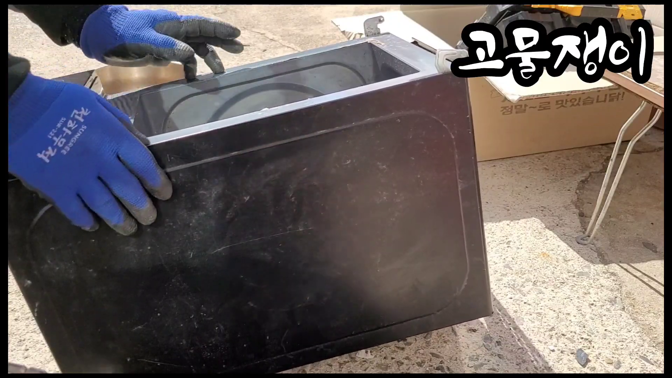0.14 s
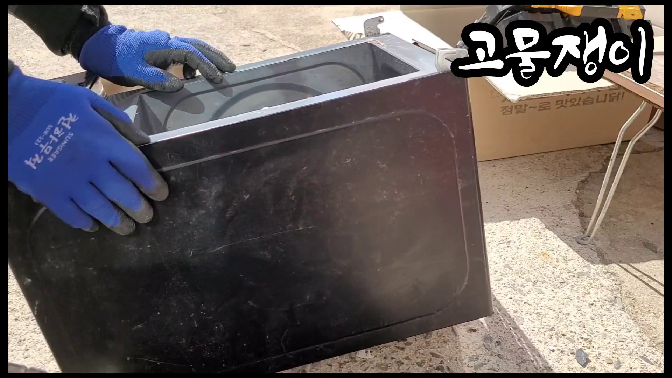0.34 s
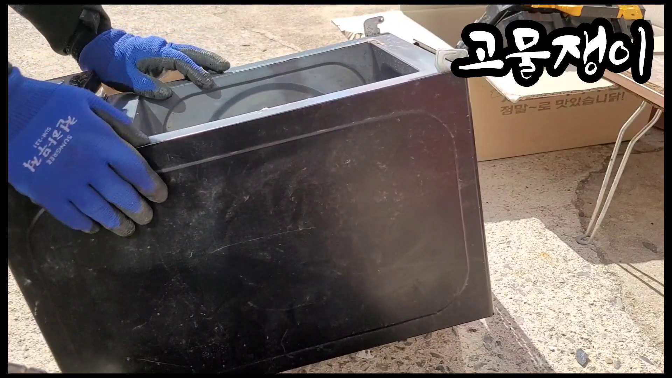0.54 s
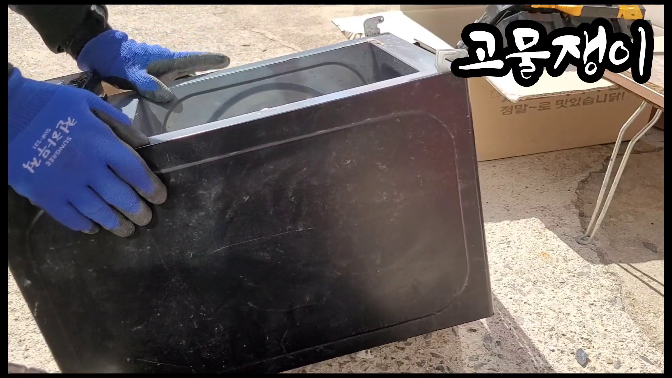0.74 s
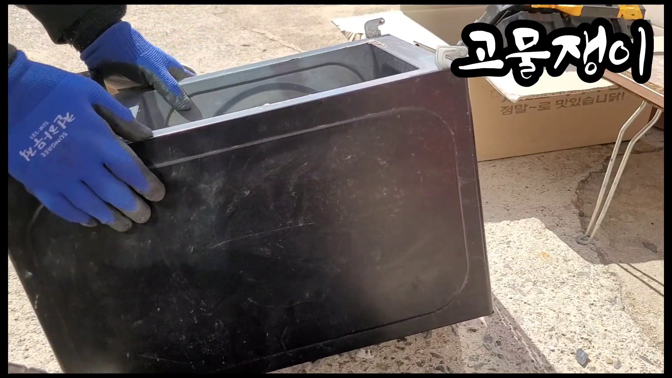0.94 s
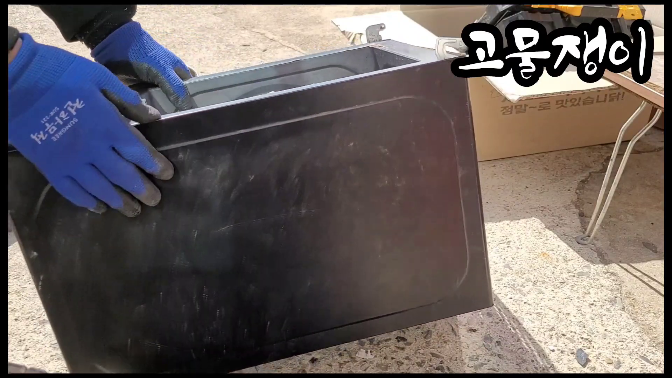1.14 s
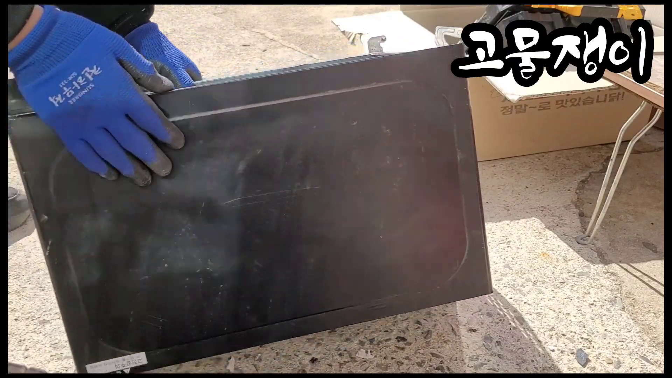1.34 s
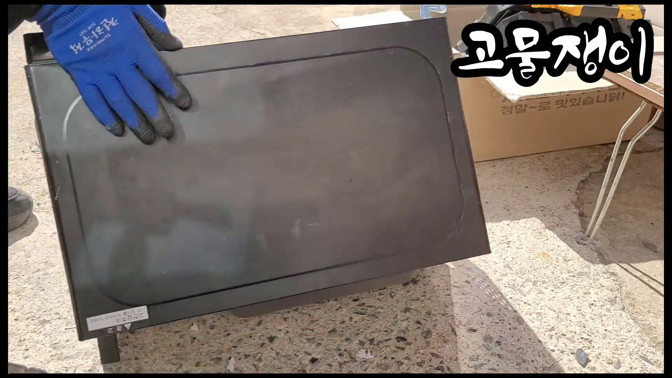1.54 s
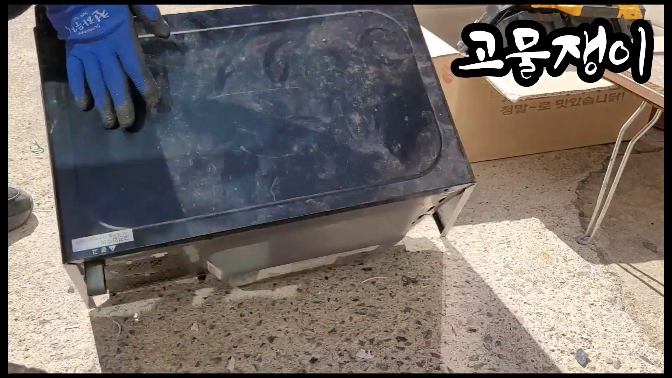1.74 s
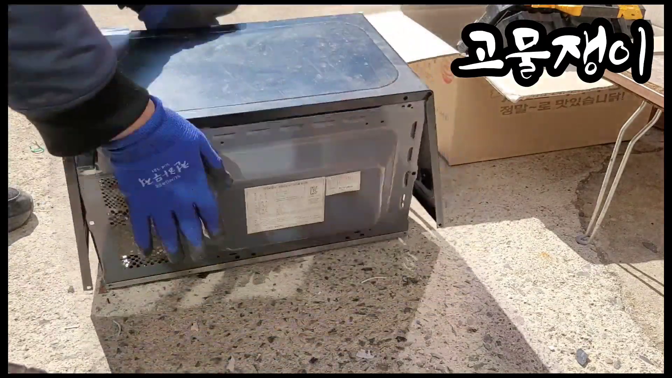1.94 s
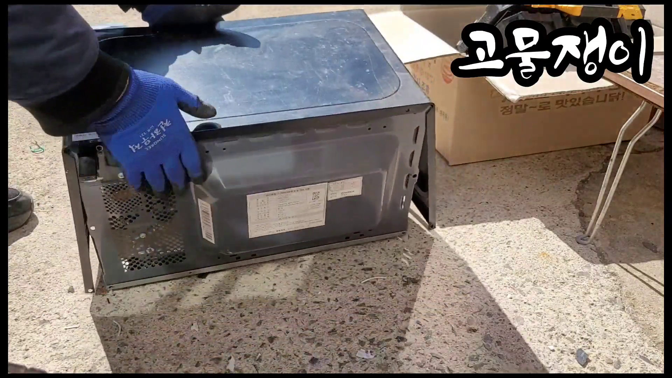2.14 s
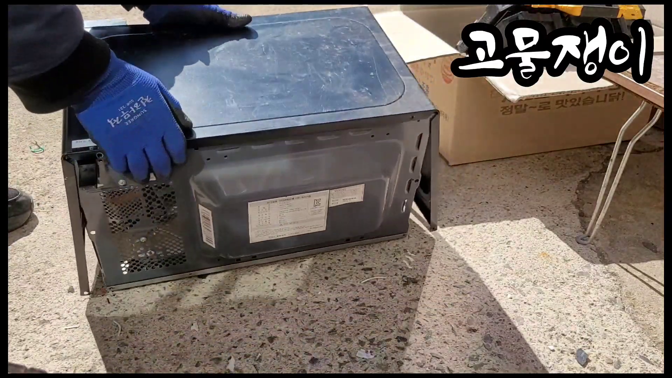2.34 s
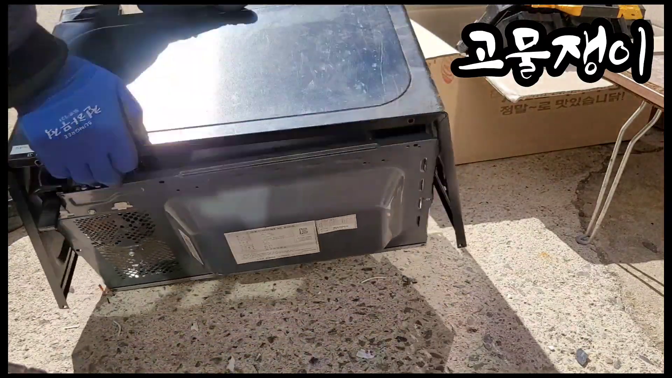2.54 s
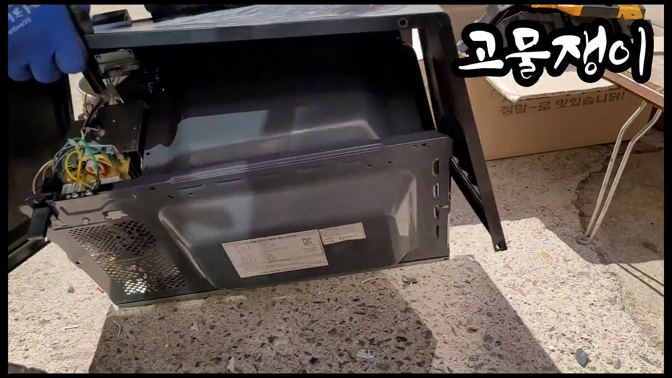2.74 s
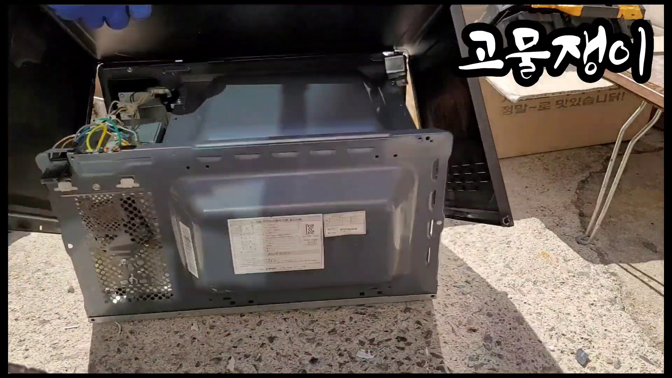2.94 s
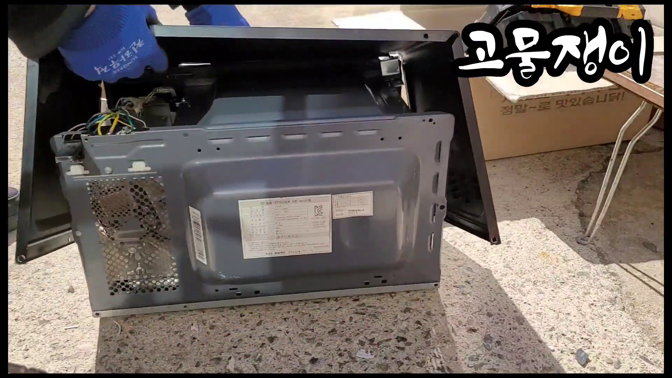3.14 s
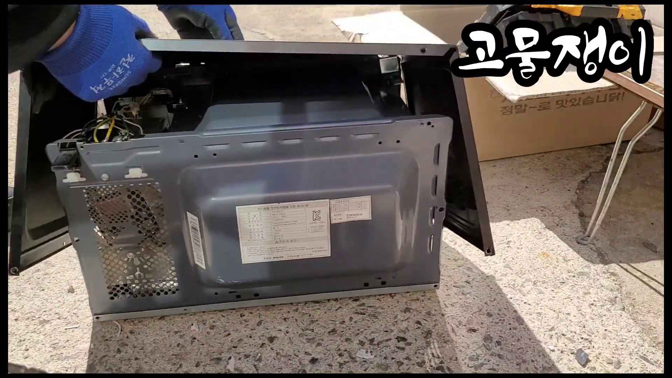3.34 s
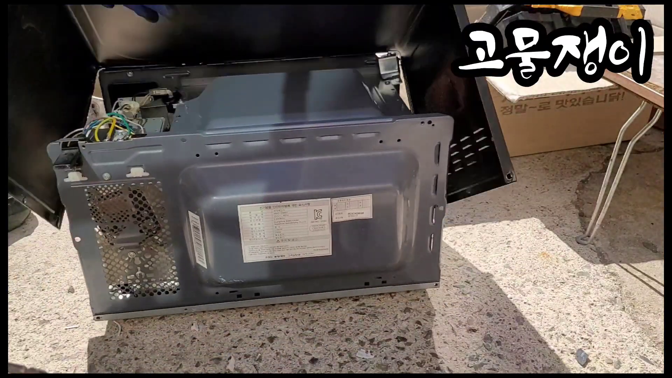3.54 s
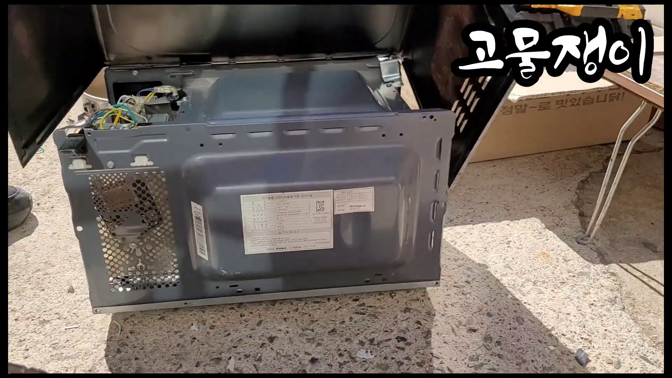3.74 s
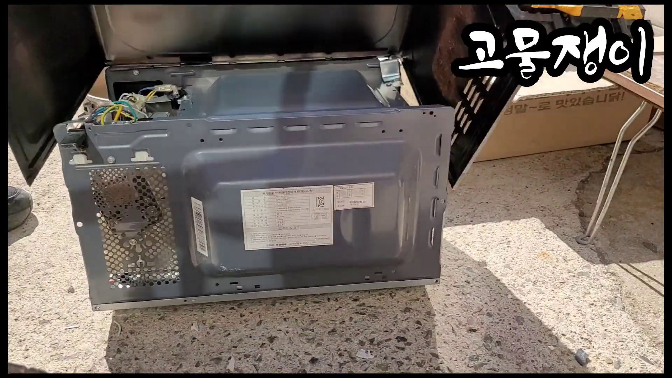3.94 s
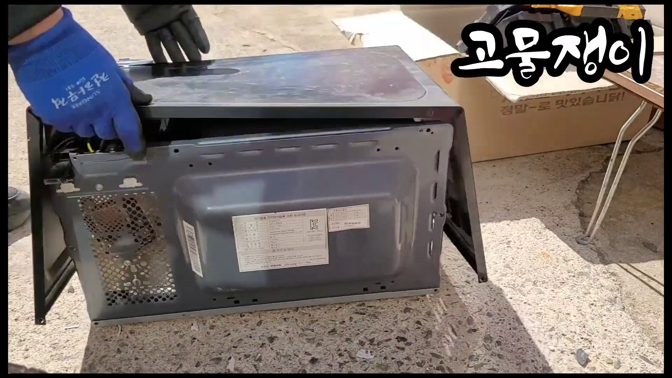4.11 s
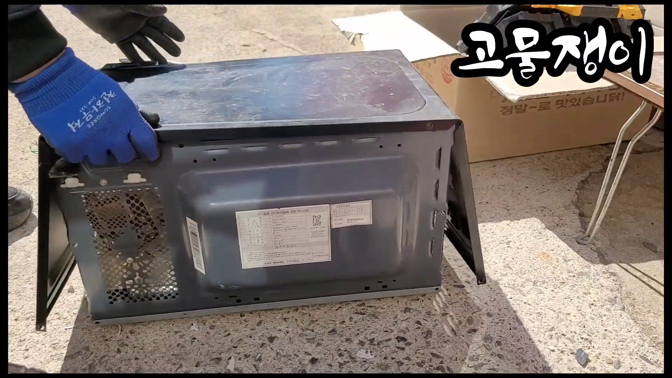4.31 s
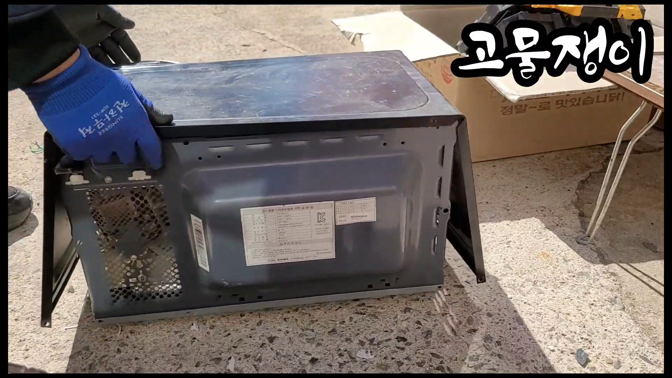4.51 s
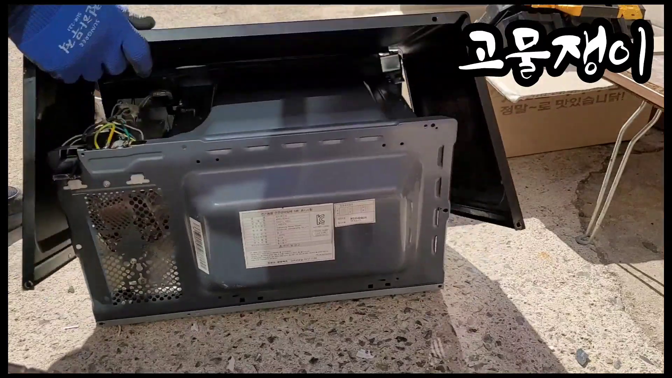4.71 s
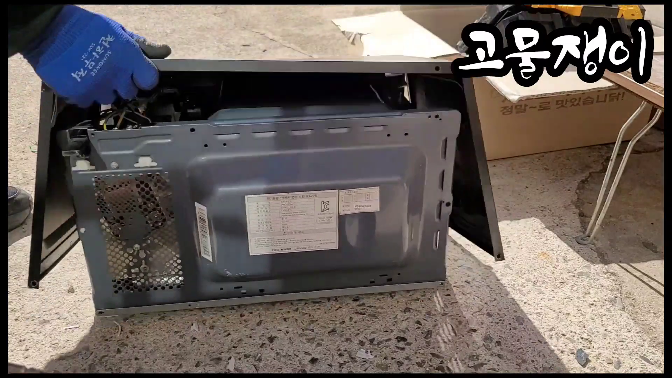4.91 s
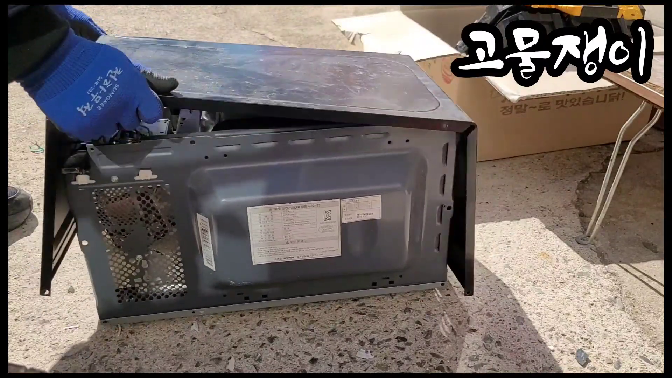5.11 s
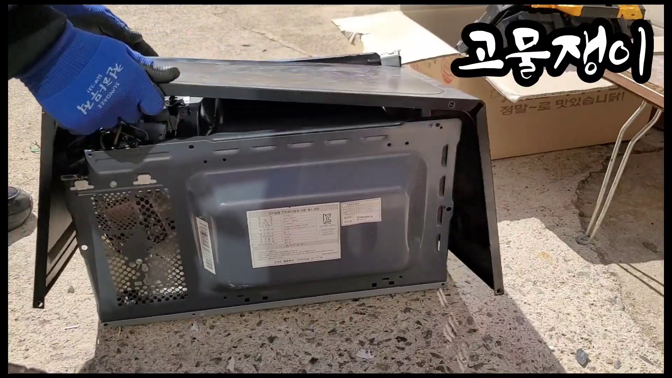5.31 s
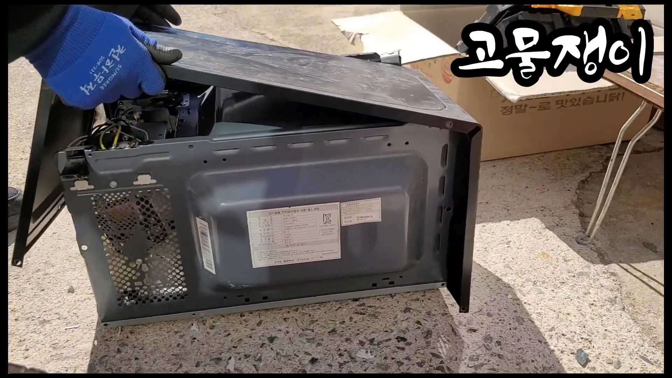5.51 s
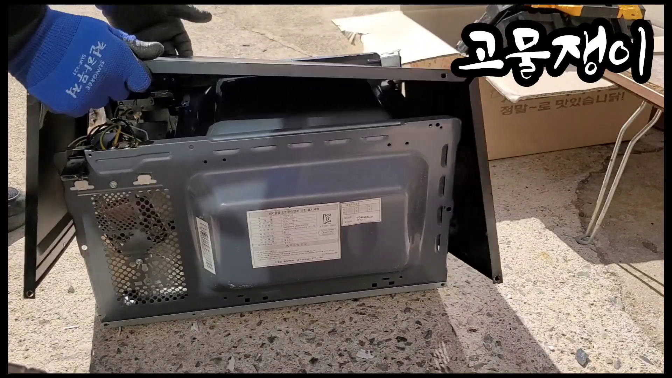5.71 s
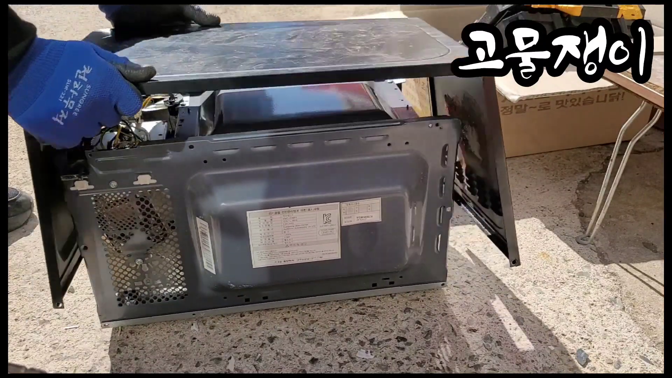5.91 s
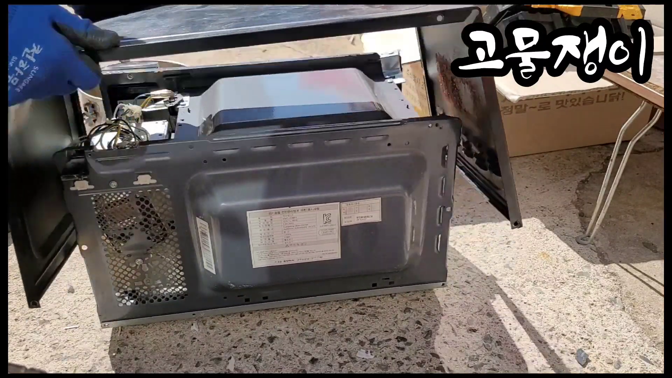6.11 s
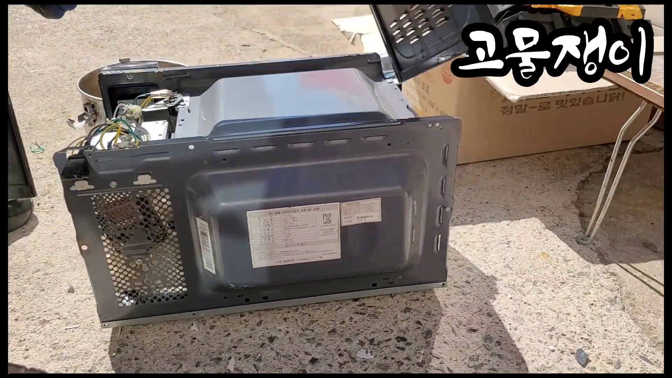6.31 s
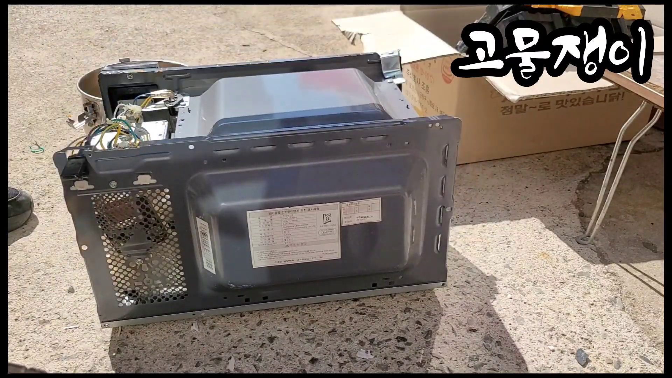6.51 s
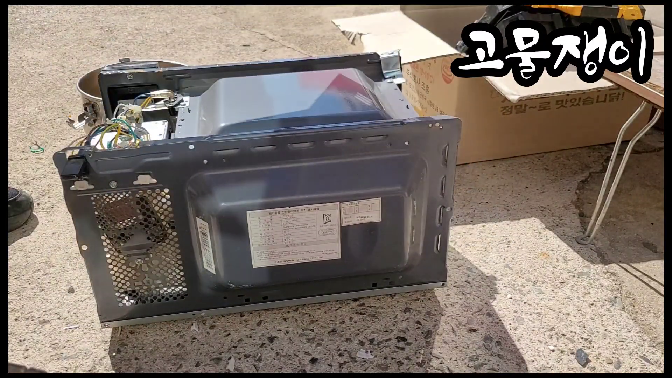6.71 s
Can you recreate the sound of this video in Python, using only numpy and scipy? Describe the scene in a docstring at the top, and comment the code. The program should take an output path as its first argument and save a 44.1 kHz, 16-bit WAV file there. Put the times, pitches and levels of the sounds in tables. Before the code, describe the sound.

Gloved hands work a sheet-metal oven casing loose: soft rubbing, a hard thud, clattering hollow knocks, wobbling panels, and scrapes before quiet open air.

```python
"""Steel oven cover worked loose

Outdoors on concrete, the sheet-steel cover of a microwave oven is worked loose and lifted off: feet drag, a
glove hisses over the paint, the oven tips over, then the cover knocks, chatters and scrapes on the chassis.
Blows excite a crowd of decaying sheet modes, slips make drags and scrapes, filtered noise makes glove and yard,
and swaying sines make the wide panels wobble. Near the end the chassis rim rings bright as the cover leaves it."""
import sys
import numpy as np
from scipy import signal
from scipy.fft import rfft, irfft, next_fast_len
from scipy.io import wavfile
from scipy.ndimage import uniform_filter1d

SR = 44100
rng = np.random.default_rng(int(sys.argv[2]) if len(sys.argv) > 2 else 0)


def generate_wav(sig):
    """Save sig (samples, or channels by samples) to the path in sys.argv[1] as 16-bit PCM at SR."""
    pcm = np.round(np.clip(np.atleast_2d(sig).T, -1, 1) * 32767).astype(np.int16)
    wavfile.write(sys.argv[1], SR, pcm)


N = 298116
RING = 65536   # length of one ring, samples
TIME = np.arange(N) / SR
AGE = np.arange(RING) / SR   # seconds since a contact
RING_HZ = np.fft.rfftfreq(RING, 1 / SR)
SIDES = np.array([[1], [-1]])   # left, right


def from_db(db):
    """Decibels to gain."""
    return 10 ** (np.asarray(db) / 20)


def rms(x):
    """Root mean square."""
    return np.sqrt(np.mean(x ** 2) + 1e-20)


def at_hz(points, hz):
    """Read a table on a log-frequency axis."""
    f, value = np.transpose(points)
    return np.interp(np.log(np.maximum(hz, 1)), np.log(f), value)


def level(rows):
    """Smoothed gain along a (time, .., dB) curve, -120 dB outside it."""
    rows = np.array(rows)
    curve_db = np.interp(TIME, rows[:, 0], rows[:, -1], left=-120, right=-120)
    return uniform_filter1d(from_db(curve_db), size=441)


def add(out, s, sound):
    """Mix a sound in from a given time on."""
    start = max(int(s * SR), 0)
    part = sound[..., :max(N - start, 0)]
    out[..., start:start + part.shape[-1]] += part


# Left-right likeness of the sound: pitch_hz, likeness (0-1)
LIKENESS = [(60, 0.89), (230, 1), (330, 0.54), (550, 0.14), (1100, 0.04), (16000, 0.028)]


def pair(mid, side, hz):
    """Two microphones: alike in the bass, different in the treble."""
    alike = np.clip(at_hz(LIKENESS, hz), 0, 1)
    return np.sqrt(1 + alike) * mid + np.sqrt(1 - alike) * side * SIDES


def coloured(source, colour):
    """Two unrelated signals become one stereo sound of the given colour; rms 1."""
    size = next_fast_len(N)
    hz = np.fft.rfftfreq(size, 1 / SR)
    mid, side = rfft(source, size)
    spectrum = pair(mid, side, hz) * from_db(at_hz(colour, hz))
    out = irfft(spectrum, size)[:, :N]
    return out / rms(out)


def noise(colour):
    """Smooth stereo noise; rms 1."""
    return coloured(rng.standard_normal((2, N)), colour)


def grains(count, per_s, spread_db):
    """Random tiny impacts of uneven size and either sign."""
    sizes = from_db(spread_db * np.minimum(rng.exponential(1, count), 4))
    return (rng.random(count) < per_s / SR) * sizes * rng.choice([-1, 1], count)


# Borders between click, clang, body and thump, from the top down: pitch_hz
ZONE_EDGES_HZ = [3500, 700, 150, 50]


def zones(x):
    """Split into click, clang, body and thump."""
    top, middle, low, bottom = ZONE_EDGES_HZ
    bands = [(top, "high"), ([middle, top], "band"), ([low, middle], "band"), ([bottom, low], "band")]
    filters = [signal.butter(3, hz, kind, fs=SR, output="sos") for hz, kind in bands]
    return [signal.sosfilt(sos, x) for sos in filters]


# Colour of the low rumble: pitch_hz, relative_db
RUMBLE_COLOUR = [(20, -14), (45, -5), (68, 4), (95, 5.5), (140, -22), (300, -40)]
# Colour of the open air: pitch_hz, relative_db
AIR_COLOUR = [(35, -52), (60, 5), (238, -11), (503, -5.5), (553, -9.5), (636, -7.5), (698, -14.5),
              (1820, -20.5), (2050, -21.5), (7000, -41.5), (16000, -54)]
AIR_DB = -52.5
RUMBLE_DB, HANDLING_DB = -55.5, -4.5   # rumble at rest, and its share of the oven's thumps


def yard(oven, air_db=0.0):
    """Quiet open air over a low rumble that swells as the oven is shaken."""
    thump = zones(oven[0])[-1]
    shaking = np.sqrt(np.abs(uniform_filter1d(thump ** 2, size=SR // 12)))
    rumble = from_db(RUMBLE_DB) + from_db(HANDLING_DB) * shaking
    return rumble * noise(RUMBLE_COLOUR) + from_db(AIR_DB + air_db) * noise(AIR_COLOUR)


EASING_DB = 5   # a drag is this much lighter at either end than midway


def pressing(rows):
    """Pressure of a series of drags, each building up and easing off."""
    return sum(level([(start, db - EASING_DB), ((start + end) / 2, db), (end, db - EASING_DB)])
               for start, end, db in rows)


def mode_strengths(is_mode, spread_db=5.0):
    """How strongly one spot of the sheet drives each mode."""
    return is_mode * from_db(spread_db * np.clip(rng.standard_normal(len(is_mode)), -2, 2))


def rubbed(pressure, strengths, slips_per_s, ring_t60, colour, direct=0.68):
    """Hundreds of slips a second, heard directly and through modes that the contact damps."""
    slips = grains(N, slips_per_s, spread_db=3.5)
    force = slips / rms(slips) * pressure
    phases = np.exp(2j * np.pi * rng.random((2, len(RING_HZ))))
    ring = irfft(strengths * phases) * from_db(-60 * AGE / ring_t60)
    ring /= np.linalg.norm(ring, axis=1, keepdims=True)
    ring[0, 0] += direct
    sound = signal.fftconvolve(force[None], ring, axes=1)[:, :N]
    return rms(pressure) * coloured(sound, colour)


# The oven's feet drag on the concrete: start_s, end_s, level_db
DRAGS = [(0.0, 0.08, -36.5), (1.43, 1.47, -41.5), (1.466, 1.56, -34.5), (1.585, 1.66, -27),
         (1.86, 1.99, -41), (6.225, 6.268, -31.5)]
# Colour of the droning box: pitch_hz, relative_db
DRAG_COLOUR = [(120, -35), (300, -3), (400, 4.5), (520, -2.5), (610, 3), (700, -8.5), (1400, -20),
               (3000, -29), (8000, -46)]


def drags(is_mode, slips_per_s=500, ring_t60=0.15):
    """Feet slipping over grit shake the closed box."""
    return rubbed(pressing(DRAGS), mode_strengths(is_mode), slips_per_s, ring_t60, DRAG_COLOUR)


# Colour of the crowd of sheet modes: pitch_hz, relative_db
SHEET_COLOUR = [(26, -44), (45, -14), (85, -5), (146, -11), (228, -3), (271, -6), (314, 0), (580, -8),
                (689, -13), (880, -12), (2080, -22), (2350, -23), (4570, -31), (13500, -35), (16000, -38)]
# Ring time of the crowd: pitch_hz, t60_s
SHEET_T60 = [(60, 0.15), (150, 0.68), (300, 0.89), (700, 0.76), (1500, 0.46), (3500, 0.44), (8000, 0.29),
             (16000, 0.25)]
# First flash round a contact, before bending waves spread over the sheet: pitch_hz, over_ring_db
FLASH_DB = [(100, 2.3), (400, 7.9), (1500, 1.9), (5000, 8.4), (14000, 5.9)]
# Fading of that flash: pitch_hz, time_constant_s
FLASH_S = [(100, 0.068), (400, 0.034), (1500, 0.027), (5000, 0.011), (14000, 0.016)]


def sheet_response(strengths):
    """One spot of the steel: the same crowd of modes, each struck with a share of its own."""
    mid, side = np.exp(2j * np.pi * rng.random((2, len(RING_HZ))))
    lines = pair(mid, side, RING_HZ) * strengths * from_db(at_hz(SHEET_COLOUR, RING_HZ))
    edges = np.geomspace(40, 18000, 13)   # bands that each decay at their own rate
    out = np.zeros((2, RING))
    for low, high in zip(edges, edges[1:]):
        hz = np.sqrt(low * high)
        in_band = (RING_HZ >= low) & (RING_HZ < high)
        flash = 1 + from_db(at_hz(FLASH_DB, hz)) * np.exp(-AGE / at_hz(FLASH_S, hz))
        decay = from_db(-60 * AGE / at_hz(SHEET_T60, hz))
        out += irfft(lines * in_band) * flash * decay
    return out


# Modes that stand out of the crowd, before a common trim and a random spread: pitch_hz, relative_db, t60_s
PANEL_MODES = [(110.4, -5.5, 4.4), (206, -30, 0.53), (223.3, -7, 0.84), (303.5, -8.5, 1), (392.6, -1, 0.37),
               (449, -14.5, 0.64), (477.5, -19, 1.06), (573, -5, 0.19), (637, -0.5, 0.14),
               (728, -8.5, 0.36), (896, -3, 0.27), (1235, -16, 0.48), (1430, -17, .35), (1700, -12, 0.37),
               (1870, -23.5, 0.16), (2040, -14, 0.15), (2845, -12, 0.29), (3280, -17, 0.13)]


def sheet_spot(strengths, uneven_db=4.0, modes_db=-5.5):
    """A crowd of equal early level in each of four zones, plus the outstanding modes."""
    parts = [part / rms(part[:, :SR // 20]) for part in zones(sheet_response(strengths))]
    for hz, db, t60 in PANEL_MODES:
        zone = sum(hz < edge for edge in ZONE_EDGES_HZ)
        # less alike sides may be further apart in phase
        apart = np.arccos(np.clip(at_hz(LIKENESS, hz), 0, 1)) * rng.normal(0, 0.37) * SIDES
        size = from_db(db + modes_db + uneven_db * rng.normal()) * rng.choice([-1, 1])
        tone = np.sin(2 * np.pi * hz * AGE + apart) * from_db(-60 * AGE / t60)
        parts[zone] = parts[zone] + size * tone
    return np.array(parts)


def above(hz, corner=0.71):
    """A part barely moves the air below its own note: a second-order high-pass."""
    ratio = 1j * RING_HZ / (corner * hz)
    return ratio ** 2 / (1 + ratio + ratio ** 2)


# How much later the right side hears a contact, until the cover swings over: time_s, delay_s
LAG = [(5.2, .00018), (5.4, -.00006)]


def delayed(sound, s):
    """The right side hears a contact a little later or sooner than the left."""
    lag = int(round(np.interp(s, *np.transpose(LAG)) * SR))
    return np.array([np.pad(side, (max(late, 0), 0))[:len(side)] for side, late in zip(sound, (-lag, lag))])


def clonk(strength_db, part_hz, clonk_db=1.5, t60=0.066, rise_s=0.00033, stiffening=2.3, relax_s=0.0032):
    """The struck part gives a short hollow note; dented steel is stiffer, so a heavy blow starts sharp and sinks."""
    age = AGE[:SR]
    shape = from_db(-60 * age / t60) * (1 - np.exp(-age / rise_s))
    hz = part_hz * (1 + stiffening * from_db(strength_db) * np.exp(-age / relax_s))
    return from_db(strength_db + clonk_db) * shape * np.sin(2 * np.pi * np.cumsum(hz) / SR)


REBOUND_S, REBOUND_SCATTER = .043, .05   # gap between landings, and its scatter as a share of the gap
# loss per landing, extra loss per dB of hardness, and treble loss per landing
REBOUND_LOSS_DB, LOSS_PER_HARDNESS, REBOUND_DULLING_DB = 11.0, 0.23, 14


def rebounds(hardness_db, count=4):
    """The springy panel lands again, duller each time; a hard bite rebounds less: (delay s, dB, treble dB)."""
    turn = np.arange(count)
    delays = REBOUND_S * (turn + REBOUND_SCATTER * rng.standard_normal(count) * (turn > 0))
    loss_db = max(REBOUND_LOSS_DB + LOSS_PER_HARDNESS * hardness_db, 2)
    return zip(delays, -loss_db * turn, -REBOUND_DULLING_DB * turn)


# The cover strikes the chassis; the last three are relative to the strength, before each zone's trim:
# start_s, strength_db, clang_db, click_db, thump_db
KNOCKS = [(0.003, -35, -9, -7, 1.5), (0.405, -50.5, -2.5, 1.5, -10), (0.723, -50, 1.5, 6, -16),
          (1.424, -52, -1, 3.5, -10), (1.577, -23, -4.5, -4, -12), (1.614, -25, -30, -26, -17),
          (1.661, -30, -9, -2.5, -20), (1.786, -33, -7, -7, -8), (1.9835, -19.5, 0, -5, -6),
          (2.0225, -18, 2, -3, -1), (2.045, -15.5, -6, -6.5, -5), (2.0838, -6, -8, -7, -5),
          (2.427, -29, -8.5, -7.5, -29), (2.532, -36, -1.5, 0.5, -11), (2.614, -29.5, -12.5, -10, -18),
          (2.6564, -39.5, 2.5, 11.5, -7), (2.6976, -28.5, 0, 2.5, -13), (2.865, -23.5, -0.5, -2.5, -3),
          (2.891, -15, 0, 2, -2.5), (2.943, -24, 6.5, 17.5, 7), (2.984, -13.5, 2.5, -3, -5),
          (3.015, -15.5, -5, -3, 2.5), (3.099, -13, -15, -8.5, -16), (3.181, -15, -2, 0, 9),
          (3.2215, -16.5, -15.5, -7.5, -15), (3.4936, -35.5, 0, 4.5, -15), (3.824, -32.5, -3.5, -6, -11),
          (3.998, -28.5, -5, -11, 0.5), (4.103, -25.5, -6.5, -9.5, -14), (4.131, -24, -5.5, -14, 4),
          (4.190, -19, -2.5, -3.5, -1), (4.252, -17, -0.5, -5, 0.5), (4.361, -15.5, -10.5, -12, -13),
          (4.4505, -26, -2.5, 7, -20), (4.524, -16, -2, -11, -4), (4.532, -14.5, -6.5, -5, -4),
          (4.604, -23, -6.5, -7, 9.5), (4.838, -29.5, -4, -9, 0), (4.855, -22, -2.5, -1.5, -18),
          (4.884, -15.5, -7.5, -16, 0), (4.928, -11.5, -4, -7, -30), (4.949, -13, -1.5, -4, 1.5),
          (5.002, -15.5, -1, 1.5, -13), (5.077, -20, -1, 1.5, -2), (5.109, -23, 8, 7, 1.5),
          (5.1435, -7.5, -4.5, 1.5, -1.5), (5.159, -7.5, -12.5, -28.5, -25),
          (5.3607, -15.5, -3.5, 0.5, -0.5), (5.411, -14, -2, -5, -4), (5.5057, -21, -3.5, 4, 5),
          (5.591, -21.5, -6, -3.5, -4.5), (5.711, -18.5, -1, -0.5, -10), (5.809, -31.5, -7, -7, 3),
          (6.216, -26.5, -24, -27.5, -3), (6.274, -17.5, -5.5, -4, -21), (6.299, -15.5, -5.5, -3, -22),
          (6.3685, -16, -2, 2, -3), (6.513, -40.5, -6, -16, 11), (6.633, -57.5, 9.5, 14.5, -12)]
# a blow is a burst of tiny contacts, briefer (dB per dB) the more its click exceeds the usual one
CHATTER_S, CHATTER_SHORTENING, USUAL_CLICK_DB = 0.004, 0.3, -31
# centre of the struck part's note (Hz), scatter from blow to blow (octaves), rise with clang (octaves per dB)
PART_HZ, PART_SCATTER, PART_RISE = 365, 0.14, .008


def knocks(spots, click_db=-13.0, clang_db=-2.0, body_db=-3.0, thump_db=-13.5,
           chatter=0.13, chatter_per_s=1500, brightening=0.018):
    """Each contact is a chattering blow that sets the whole sheet ringing, then a few duller rebounds."""
    out = np.zeros((2, N))
    responses = [rfft(spot.astype(np.float32)) for spot in spots]
    for k, (s, strength_db, clang_over_db, hardness_db, weight_db) in enumerate(KNOCKS):
        sharpness_db = strength_db + hardness_db - USUAL_CLICK_DB
        part_hz = PART_HZ * 2 ** (PART_RISE * clang_over_db + PART_SCATTER * rng.standard_normal())
        progress = AGE / (CHATTER_S * from_db(-CHATTER_SHORTENING * sharpness_db))
        swell = progress * np.exp(1 - progress)
        force = chatter * grains(RING, chatter_per_s, spread_db=4.0) * swell
        force[0] += 1   # the blow itself
        # a harder contact is shorter, so it reaches further into the treble
        tilt = np.maximum(RING_HZ / ZONE_EDGES_HZ[0], 1) ** (brightening * sharpness_db)
        click, clang, body, thump = responses[k % len(spots)] * rfft(force).astype(np.complex64)
        rings = [irfft(zone)[:, :SR] for zone in (click * tilt, clang, body * above(part_hz), thump)]
        zone_db = [click_db + hardness_db, clang_db + clang_over_db, body_db, thump_db + weight_db]
        gains = from_db(strength_db + np.array(zone_db))
        click, clang, body, thump = [ring * (gain / rms(ring[:, :SR // 40])) for ring, gain in zip(rings, gains)]
        treble = delayed(click + clang, s)
        bass = delayed(body + thump, s) + clonk(strength_db, part_hz)
        for delay, db, dull_db in rebounds(hardness_db):
            add(out, s + delay, from_db(db) * (bass + from_db(dull_db) * treble))
    return out


# Strokes of glove and sleeve, with the level at full speed: start_s, fastest_s, end_s, level_db
RUBS = [(0.317, 0.673, 1.63, -47), (1.737, 1.947, 2.12, -43.5), (3.604, 3.68, 3.79, -52.5)]
# Colour of fabric on paint: pitch_hz, relative_db
RUB_COLOUR = [(710, -35), (1200, -20), (1560, -6), (2230, -20), (2760, -0.5), (4260, 2), (9210, -4),
              (12700, -1), (16000, 0.5)]


def glove(fibres=.5, speed_power=1.31):
    """Fabric on paint: a fine hiss with single fibres catching, louder as the hand moves faster."""
    catches = grains(2 * N, per_s=1500, spread_db=0.0).reshape(2, N)
    hiss = coloured(rng.standard_normal((2, N)) + fibres * catches, RUB_COLOUR)
    loudness = np.zeros(N)
    for start, fastest, end, db in RUBS:
        speed = np.interp(TIME, [start, fastest, end], [0, 1, 0])
        loudness += from_db(db) * speed ** speed_power
    return hiss * loudness


# Bends that set the wide panels wobbling: start_s, pitch_hz, level_db, t60_s
WOBBLE = [(0.92, 63.4, -45, 4.3), (2.089, 113, -35.5, 1.2), (2.681, 59.6, -47, 6.8),
          (3.19, 111.4, -28, 1.95), (3.45, 90.2, -44.5, 6.1), (4.149, 113, -32, 1.4),
          (4.619, 113.2, -33.5, 1.05), (4.682, 77, -36.5, 3.1), (5.369, 112.4, -30, 0.92),
          (5.851, 95.1, -56, 8.8), (6.449, 90.7, -43, 5.3)]


def wobble(wobble_db=0.0, octave_db=6.0, rise_s=.025, sway=0.17):
    """The loose panels hum in their lowest mode; the pitch sways with the bend, and wide swings add the octave."""
    out = np.zeros(N)
    widest_db = max(row[2] for row in WOBBLE)
    for s, hz, db, t60 in WOBBLE:
        bend = np.interp(TIME, np.linspace(0, N / SR, 60), rng.standard_normal(60))
        phase = 2 * np.pi * hz * TIME + np.pi * sway * bend
        swing = from_db(db - 60 * TIME / t60) * (1 - np.exp(-TIME / rise_s))
        octave = from_db(octave_db - widest_db) * swing * np.sin(2 * phase)
        add(out, s, from_db(wobble_db) * np.sqrt(2) * swing * (np.sin(phase) + octave))
    return out


# Edges dragging over each other: start_s, end_s, level_db
SCRAPES = [(2.872, 2.985, -19), (2.976, 3.16, -24), (4.115, 4.31, -28), (4.905, 5.017, -25),
           (5.078, 5.16, -20), (5.18, 5.35, -26.5), (6.262, 6.345, -21), (6.355, 6.402, -16)]
# Colour of the scrapes: pitch_hz, relative_db
SCRAPE_COLOUR = [(88, -93), (150, -15), (368, -2), (545, -10.5), (1360, -14.5), (1530, -14.5),
                 (1760, -13.5), (2310, -20), (2760, -21.5), (9260, -30), (16000, -33)]


def scrapes(is_mode, slips_per_s=900, ring_t60=0.094):
    """A steel edge catches and slips along the chassis."""
    return rubbed(pressing(SCRAPES), mode_strengths(is_mode), slips_per_s, ring_t60, SCRAPE_COLOUR)


# The inner rim of the chassis is struck as the cover leaves it: start_s, level_db
RIM_HITS = [(6.3001, -35), (6.3699, -27.5), (6.378, -39), (6.389, -28.5)]
# Modes of that rim: pitch_hz, relative_db, t60_s
RIM_MODES = [(1760, -1, 0.3), (2055, 6, 0.16), (2212, 4, 0.27), (2610, -5, 0.22), (2860, 7, 0.079),
             (3113, 1, 0.11), (3270, 1, 0.12), (3506, 3.5, 0.1), (3650, -1, 0.068), (3940, -9, 0.073)]


def struck_rim():
    """The stiff inner rim of the chassis rings bright when the departing cover strikes it."""
    out = np.zeros((2, N))
    for s, hit_db in RIM_HITS:
        for hz, db, t60 in RIM_MODES:
            phases = 2 * np.pi * rng.random((2, 1))
            decay = from_db(hit_db + db - 60 * AGE / t60)
            add(out, s, decay * np.sin(2 * np.pi * hz * AGE + phases))
    return out


def scene(mode_spacing_hz=3.0, pan_db=0.48):
    """The oven stands a little to the left; thin steel has a mode every few hertz."""
    is_mode = rng.random(len(RING_HZ)) < RING_HZ[1] / mode_spacing_hz
    spots = [sheet_spot(mode_strengths(is_mode)) for _ in range(8)]
    oven = knocks(spots) + scrapes(is_mode) + drags(is_mode) + struck_rim() + glove()
    return oven * from_db([[pan_db], [-pan_db]]) + wobble() + yard(oven)


CUTOFF_HZ = 16000


def record(dry):
    """The highest peaks are rounded, the top is cut."""
    rounded = dry / (1 + dry ** 6) ** (1 / 6)
    low_pass = signal.ellip(10, .1, 80, CUTOFF_HZ, fs=SR, output="sos")
    return signal.sosfilt(low_pass, rounded)


dry = scene()
out = record(dry)
generate_wav(out)
```